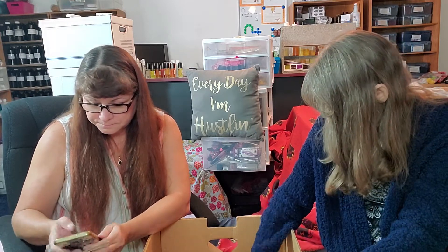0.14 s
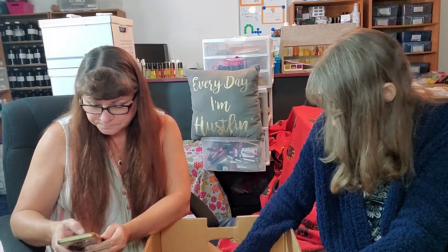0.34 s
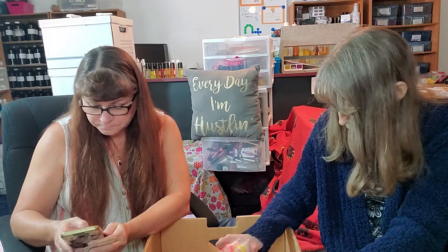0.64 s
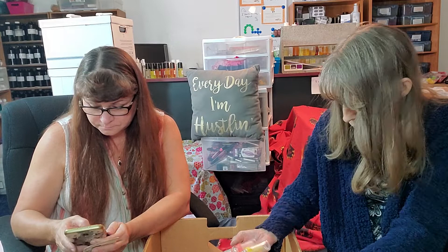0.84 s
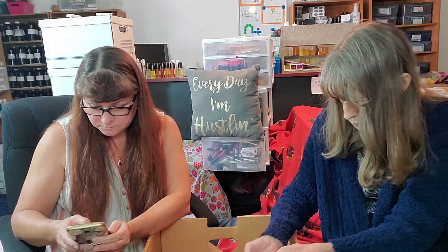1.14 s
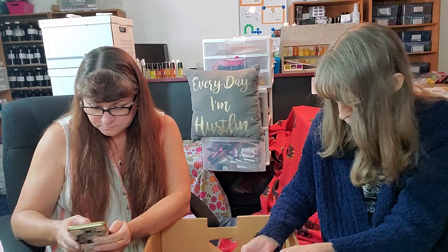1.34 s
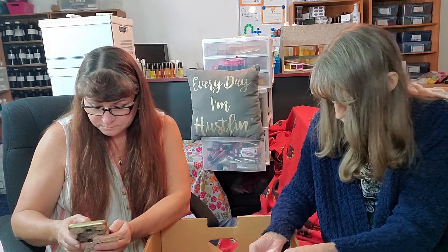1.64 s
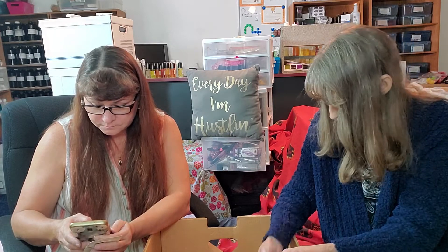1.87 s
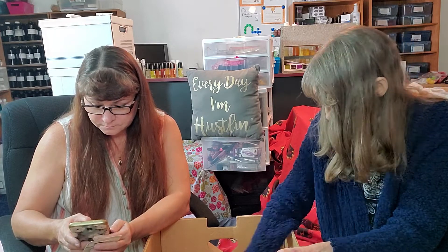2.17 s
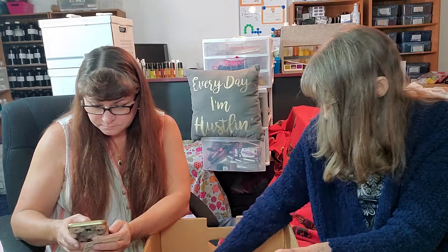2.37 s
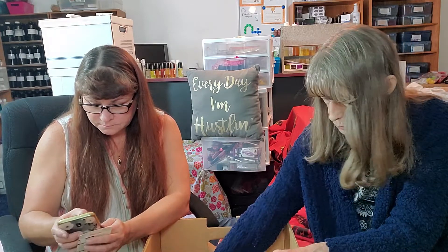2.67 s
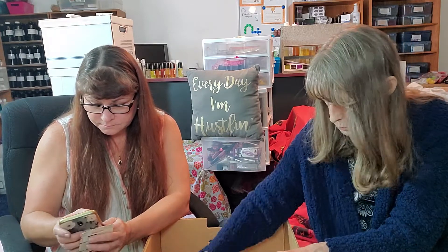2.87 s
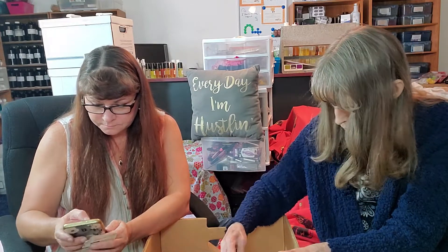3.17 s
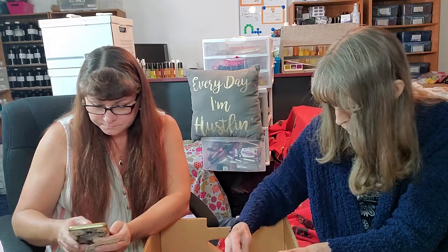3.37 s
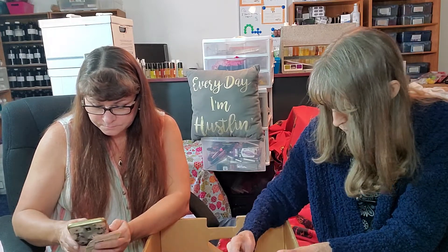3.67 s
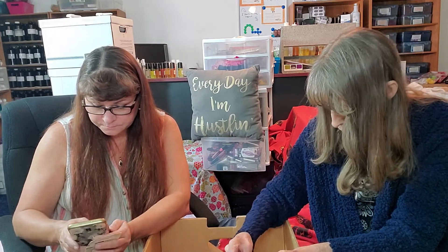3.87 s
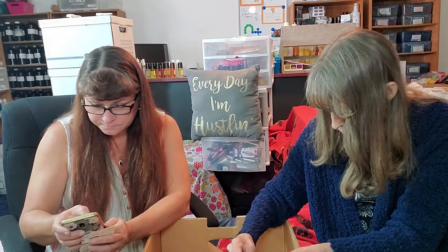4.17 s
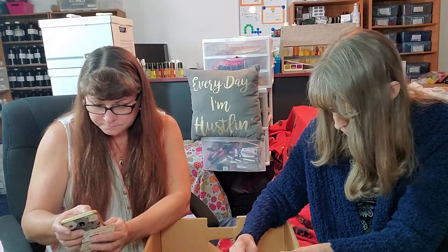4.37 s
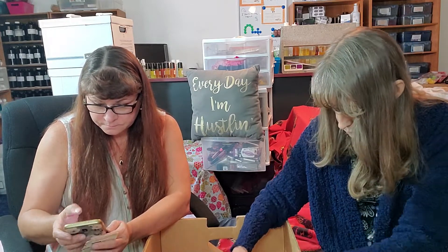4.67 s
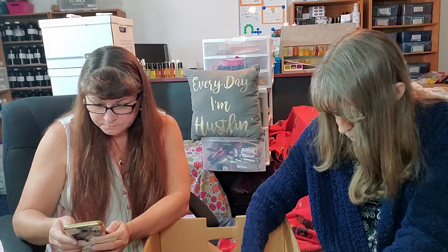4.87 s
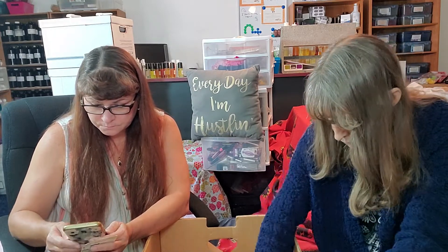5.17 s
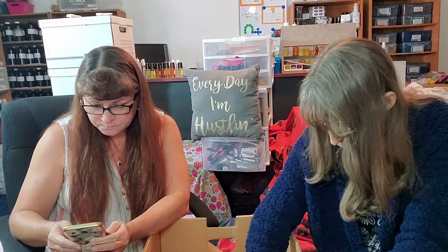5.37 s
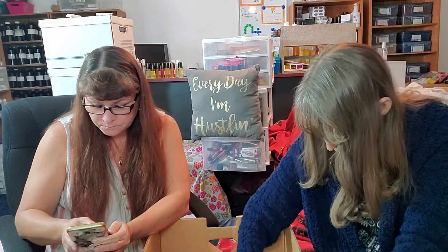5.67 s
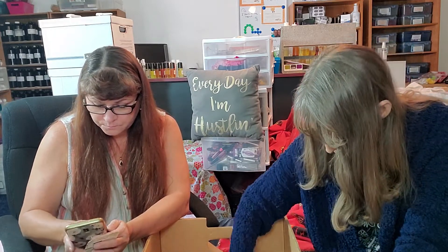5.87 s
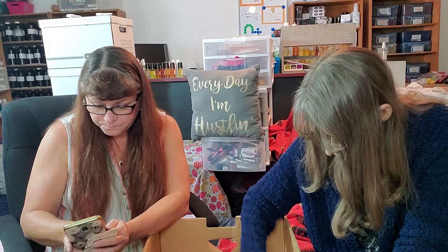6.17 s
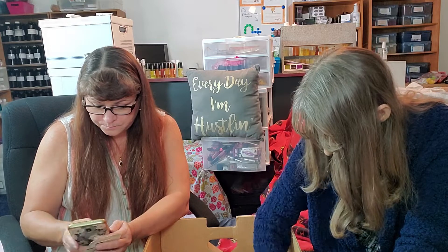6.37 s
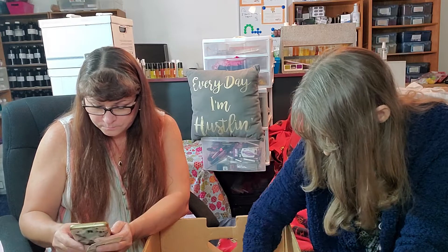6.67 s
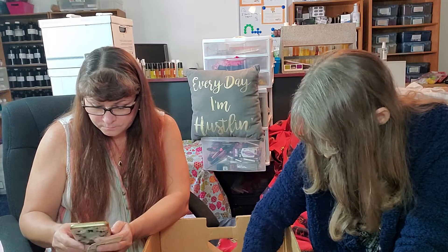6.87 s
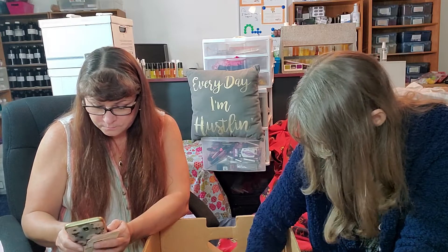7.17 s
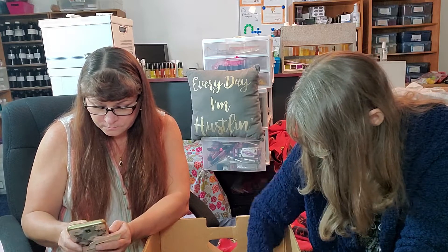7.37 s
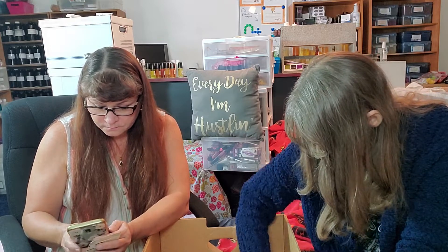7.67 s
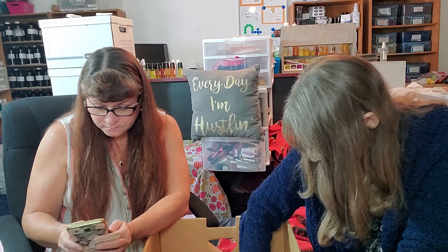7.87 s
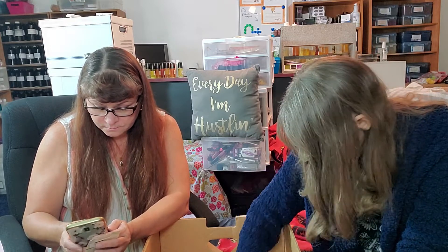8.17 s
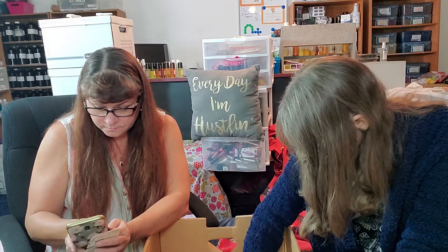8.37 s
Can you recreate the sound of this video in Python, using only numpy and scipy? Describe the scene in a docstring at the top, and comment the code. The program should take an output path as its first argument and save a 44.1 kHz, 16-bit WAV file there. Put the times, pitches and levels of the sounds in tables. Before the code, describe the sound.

Small hard plastic items click and knock in a cardboard box, sparsely at first, then rummaged with steady rattling and rustling in a small room.

```python
"""Small plastic cosmetics click against each other as they are picked up, dropped and rummaged through
in a cardboard box in a small room: noise chatter, short shell rings and scatter inside the box.
They knock on the cardboard (thuds and box modes); a small hard jar clinks three times, the first faintly.
Each stroke of the hand is a dense rattle of random tiny impacts over the rumble of the box walls.
Finger slides are fine friction noise; a short diffuse tail and a low hush lie behind."""
import sys
import numpy as np
from scipy import signal
from scipy.fft import rfft, irfft, next_fast_len
from scipy.io import wavfile
from scipy.ndimage import uniform_filter1d

SR = 44100
rng = np.random.default_rng(int(sys.argv[2]) if len(sys.argv) > 2 else 0)


def unload_wav(signal):
    """Save mono or channel-first audio to the path in sys.argv[1] as 16-bit WAV at rate SR, clipped to [-1, 1]."""
    wavfile.write(
        sys.argv[1],
        SR,
        np.round(np.clip(np.atleast_2d(signal).T, -1, 1) * 32767).astype(np.int16),
    )


N = 376613
TIME_S = np.arange(N) / SR
RING_S = TIME_S[:SR // 4]

# spectrum of hard plastic contact: (frequency [Hz], relative level [dB])
PLASTIC_SPECTRUM = [(100, -13), (400, -12), (1200, -15.5), (2200, -7.5), (3200, -1), (4100, -4.5),
                    (5300, 2), (7000, -1.5), (10000, -8), (16000, -11.5)]
# microphone response: (frequency [Hz], gain [dB])
MIC_RESPONSE = [(6900, -3), (7600, -8.5), (8500, -26.5), (10200, -15.5), (11500, -24), (16000, -24)]


def amp(db):
    """Decibels to gain."""
    return 10 ** (np.asarray(db) / 20)


def evened(x):
    """Scales to rms 1."""
    return x / np.sqrt(np.mean(x ** 2) + 1e-20)


def unit(x):
    """Scales to energy 1 per channel, averaged over the channels."""
    return evened(x) / np.sqrt(x.shape[-1])


def read(points, hz):
    """Interpolates a spectrum table on a log-frequency axis."""
    f, value = np.transpose(points)
    return np.interp(np.log(hz + 1), np.log(f + 1), value)


def add(mix, start_s, sound):
    """Adds a stereo sound at its start time."""
    part = mix[:, round(start_s * SR):][:, :sound.shape[-1]]
    part += sound[..., :part.shape[1]]


def colour(x, points, tilt_db=0, pivot_hz=1000, peak_hz=1000, peak_db=0, peak_octaves=0.063, size=4096):
    """Causal minimum-phase filter: a spectrum, tilted in dB per octave, plus an optional resonance."""
    hz = abs(np.fft.fftfreq(size, 1 / SR))
    db = read(points, hz) + tilt_db * np.clip(np.log2((hz + 1) / pivot_hz), -2, 2)
    db = db + peak_db / (1 + (np.log2((hz + 1) / peak_hz) / peak_octaves) ** 2)
    spectrum = np.exp(np.conj(signal.hilbert(np.log(amp(db)))))
    impulse = np.fft.ifft(spectrum).real[:size // 2]
    return signal.oaconvolve(x, impulse[None], axes=1)[:, :x.shape[1]]


def diffuse(x):
    """Makes two unrelated channels alike in the bass, as at two close ports."""
    # left-right likeness of diffuse sound: (frequency [Hz], correlation [-1..1])
    likeness = [(60, 1), (250, 0.91), (500, 0.36), (1000, 0.3), (2000, 0.57)]
    size = next_fast_len(x.shape[1] + len(RING_S))
    same = read(likeness, np.fft.rfftfreq(size, 1 / SR))
    a, b = rfft(x, size)
    return irfft([a, same * a + np.sqrt(1 - same ** 2) * b], size)[:, :x.shape[1]]


def ports(x, lag_samples=4.0, most_rad=1.87):
    """Delays the right port (the left if negative); the housing limits the phase lead in the treble."""
    size = next_fast_len(len(x) + len(RING_S))
    lead_rad = most_rad * np.tanh(2 * np.pi * np.fft.rfftfreq(size) * lag_samples / most_rad)
    return irfft(rfft(x, size) * np.exp(-1j * lead_rad * [[0], [1]]), size)[:, :len(x)]


def ring(modes):
    """Sums dying sines of random sign, energy 1; modes are (Hz, relative dB, t60 s)."""
    total = 0
    for hz, db, t60_s in modes:
        decay = amp(db - 60 * RING_S / t60_s)
        total = total + rng.choice([-1, 1]) * decay * np.sin(2 * np.pi * hz * RING_S)
    return unit(total)


def burst(t60_s):
    """A dying puff of noise, energy 1."""
    return unit(rng.standard_normal(len(RING_S)) * amp(-60 * RING_S / t60_s))


def scatter(t60_s):
    """Sound bouncing between the box walls and their contents, as diffuse dying noise."""
    return diffuse(np.array([burst(t60_s), burst(t60_s)]))


def chatter(contact_s):
    """Two faces bounce and scrape: noise that swells over the contact time and dies."""
    u = RING_S / contact_s
    return unit(rng.standard_normal(len(RING_S)) * u * np.exp(-u))


def clicks(level_db=21, shell_db=-4.0, body_db=4, scatter_db=-4, scatter_t60_s=0.16,
           side_mode_db=-4, pan_db=1.8, count=10):
    """Chatter through the body of the case, the short ring of its thin shell, and scatter in the box."""
    # plastic on plastic: (time [s], level re level_db [dB], main ring [Hz], face chatter time [s])
    click_events = [(0.0339,-26,5460,0.00061), (.203,-40,5070,0.00059), (.517,-40.5,4890,0.00054),
                    (.534,-41,3900,0.0019), (1.1935,-13.5,3350,0.0022), (1.1951,-10.5,6700,0.0035),
                    (1.284,-21.5,3520,0.0019), (1.2848,-35.5,5450,0.0011), (1.3046,-28,2230,.0019),
                    (1.3613,-25.5,3260,0.0023), (1.4498,-33.5,3960,0.0014), (2.066,-11.5,6130,0.0011),
                    (2.0723,-16.5,4900,.0021), (2.139,-31.5,5640,0.0058), (2.234,-25.5,4580,0.0013),
                    (2.241,-24.5,4930,0.0048), (2.3123,-19.5,3166,0.0019), (2.7278,-40,3560,0.0014),
                    (2.787,-42.5,7160,0.0021), (2.846,-27.5,4040,0.0011), (4.088,-28.5,3520,0.0022),
                    (4.096,-22,5798,0.0028), (4.7521,-21.5,2920,0.0022), (4.7703,-14,5700,.0004),
                    (4.8168,-20,4860,0.0018), (4.89,-26,3650,0.0015), (4.901,-20.5,4740,0.00035),
                    (4.9083,-26,4770,0.0038), (5.1833,-37,3030,0.004), (5.253,-29.5,4100,0.0072),
                    (5.339,-23.5,3110,0.0023), (5.3802,-29,3430,.002), (5.4572,-25.5,4730,0.0015),
                    (5.4853,-27.5,4930,.0015), (5.541,-24,2850,0.0018), (5.573,-23,4900,0.00066),
                    (5.5976,-23.5,5080,0.001), (5.6402,-25.5,6100,0.00071), (5.7311,-24.5,5040,0.0045),
                    (5.797,-21,5170,0.0033), (5.8179,-18.5,6380,0.00092), (5.8786,-19,3510,0.00036),
                    (5.9459,-28.5,6140,0.0024), (6.003,-38,6620,0.0011), (6.0226,-32,6720,0.00082),
                    (6.0818,-19,5600,0.0027), (6.1908,-28,3230,0.0046), (6.222,-19,5020,0.00093),
                    (6.4546,-22,3520,0.0051), (6.536,-24.5,6070,0.0062), (6.7169,-23.5,4770,.001),
                    (6.778,-23.5,5030,0.013), (6.815,-26,5130,0.0019), (6.877,-32,4340,0.0051),
                    (6.958,-34.5,3350,0.0048), (7.036,-31,3860,.001), (7.216,-33,3670,0.0056),
                    (7.2874,-28,3530,0.0011), (7.3018,-21,6480,0.0008), (7.367,-31.5,6100,0.0077),
                    (7.4639,-28.5,5750,0.002), (7.567,-35.5,2900,0.0022), (7.689,-26.5,3280,0.0023),
                    (7.747,-23,4630,0.0021), (7.906,-31.5,5130,0.0013), (7.953,-17.5,5370,0.0035),
                    (8.034,-24,4960,.0015), (8.0512,-16,5410,0.0003), (8.093,-29,4550,0.0013),
                    (8.1787,-26.5,5900,0.00034), (8.2566,-35,5050,0.0016), (8.3067,-36,4660,.002),
                    (8.351,-35.5,3260,0.0003), (8.3963,-26,6000,0.0032), (8.491,-38.5,3380,0.00062)]
    shell_t60_s = 0.032
    # smaller cases ring higher and sound brighter
    even_hz, brighten_db_per_oct_per_oct = 5370, 8.5
    out = np.zeros((2, N))
    for start_s, db, hz, contact_s in click_events:
        side_modes = [(f, side_mode_db, shell_t60_s) for f in rng.uniform(1300, 7600, count)]
        shell = ring([(hz, 0, shell_t60_s)] + side_modes)
        contact = ports(chatter(contact_s), lag_samples=rng.uniform(1.5, 12))
        shell = amp(shell_db) * ports(shell, lag_samples=rng.uniform(-3.7, 11.0))
        swell = 1 - np.exp(-RING_S / contact_s)
        sound = contact + swell * (shell + amp(scatter_db) * scatter(scatter_t60_s))
        tilt_db = brighten_db_per_oct_per_oct * np.log2(hz / even_hz)
        sound = colour(sound, PLASTIC_SPECTRUM, tilt_db, 6500, hz, body_db)
        sound = unit(colour(sound, MIC_RESPONSE))
        pan = np.array([[.5], [-.5]]) * pan_db * rng.standard_normal()
        add(out, start_s, amp(db + level_db + pan) * sound)
    return out


def knocks(level_db=23, thud_s=0.0045, thud_db=-6, box_db=-5, hollow_db=-12, hollow_t60_s=0.036, count=6):
    """A dull thud rings the whole box, the spot that is struck and the hollow case that lands there."""
    # landings: (time [s], level re level_db [dB], struck spot pitch [Hz], tilt [dB/octave])
    knock_events = [(0.032,-32.5,427,-1), (1.194,-23,786,1.5), (1.303,-25,326,0), (1.362,-26,255,7.5),
                    (2.066,-23.5,852,-2), (2.137,-33,1000,2), (2.235,-26.5,280,2), (2.313,-27,904,1),
                    (2.338,-19,260,0), (2.339,-22,727,4), (2.739,-39,690,-2), (2.89,-31.5,653,-2),
                    (2.907,-29,241,-1), (4.752,-21,139.4,-9.5), (4.899,-30,222,-10.5), (5.154,-32.5,235,-6),
                    (5.337,-29,240,-5), (5.419,-23.5,243,-6.5), (5.532,-25.5,134,-6.5),
                    (5.556,-30.5,594,-2), (5.587,-28.5,260,-4), (5.616,-28.5,140,-17),
                    (5.675,-24.5,229.5,-2), (5.816,-25.5,905,10), (6.106,-29.5,135,-6.5),
                    (6.348,-36.5,893,5), (6.395,-22,223,-5.5), (6.456,-24,816,8.5), (6.622,-32,924,4),
                    (6.714,-26,152,-13.5), (6.805,-29.5,268,-6.5), (7.148,-38,408,-7), (7.295,-32.5,240,-8),
                    (7.362,-31,227,-7), (7.462,-34.5,235,-9), (7.562,-28,278,-9), (7.701,-31,735,0),
                    (7.897,-28.5,253,1), (7.956,-30.5,557,-2.5), (8.089,-31.5,390,-1),
                    (8.149,-30.5,136,-6.5)]
    # box modes: (frequency [Hz], relative level [dB], t60 [s])
    box_modes = [(135, -3, 0.06), (244, -1.5, 0.059), (330, -7.5, 0.24), (400, -1.5, 0.071),
                 (533, 1.5, 0.057), (726, -6.5, .06), (830, -1, 0.11), (920, 0.5, 0.035)]
    # cardboard spectrum: (frequency [Hz], relative level [dB])
    cardboard_spectrum = [(40, -32.5), (90, -18.5), (135, -1.5), (250, 6), (380, 2.5), (750, 5), (1300, -2),
                          (2200, -10), (4000, -17), (9000, -44.5)]
    spot_cycles = 24  # cycles to fall 60 dB
    out = np.zeros((2, N))
    for start_s, db, hz, tilt_db in knock_events:
        hollow = ring([(f, 0, hollow_t60_s) for f in rng.uniform(500, 2200, count)])
        parts = [(thud_db, chatter(thud_s)), (box_db, ring(box_modes)), (hollow_db + tilt_db, hollow)]
        sound = 0
        for part_db, part in parts:
            sound = sound + amp(part_db) * unit(colour(ports(part), cardboard_spectrum, tilt_db, 340))
        swell = 1 - np.exp(-RING_S * hz)
        spot = ports(ring([(hz, 0, spot_cycles / hz)]) * swell)
        add(out, start_s, amp(db + level_db) * unit(sound + spot))
    return out


def jars(clink_db=22, tick_db=-3, tick_s=0.0022):
    """The hard jar's modes ring after a contact tick; each clink has its own spectral tilt."""
    # clinks: (time [s], level re clink_db [dB], tilt [dB/octave])
    clink_events = [(3.624, -47.5, -5.5), (3.6504, -27, -1), (7.148, -21.5, -1)]
    # jar modes: (frequency [Hz], relative level [dB], t60 [s])
    jar_modes = [(6160, 16, 0.043), (6400, 12, 0.11), (6760, 7.5, 0.096), (10200, -4.5, 0.03),
                 (9980, 11.5, 0.08)]
    out = np.zeros((2, N))
    for start_s, db, tilt_db in clink_events:
        body = ports(ring(jar_modes))
        tick = unit(colour(ports(chatter(tick_s)), PLASTIC_SPECTRUM))
        sound = unit(colour(body + amp(tick_db) * tick, MIC_RESPONSE, tilt_db, 4400))
        add(out, start_s, amp(db + clink_db) * sound)
    return out


def pings(level_db=21):
    """One stiff case sings on when touched: a thin, clear note of lightly damped modes."""
    # touches: (time [s], level re level_db [dB])
    ping_events = [(.204, -53), (.64, -52), (2.241, -28.5), (4.818, -30)]
    # stiff case modes: (frequency [Hz], relative level [dB], t60 [s])
    stiff_modes = [(5300, 3, 0.21), (5080, -4.5, .08)]
    out = np.zeros((2, N))
    for start_s, db in ping_events:
        add(out, start_s, amp(db + level_db) * ports(ring(stiff_modes)))
    return out


def taps(level_db=22, note_t60_s=0.043, twin_t60_s=0.019):
    """A small pot, never quite round, gives a soft hollow note of two close modes."""
    # taps: (time [s], level re level_db [dB], upper mode [Hz])
    tap_events = [(3.18, -55, 1667), (3.328, -54, 1310), (3.6493, -35, 962), (1.366, -29, 1273),
                  (7.345, -39.5, 1575)]
    out = np.zeros((2, N))
    for start_s, db, hz in tap_events:
        note = ring([(hz, 0, note_t60_s), (.93 * hz, -5, twin_t60_s)])
        add(out, start_s, amp(db + level_db) * ports(note))
    return out


def slips(per_s, spread_db):
    """Stick and slip: random tiny impacts, a few much larger than the rest."""
    size = amp(spread_db * np.minimum(rng.exponential(1, N), 3.5))
    return size * rng.choice([-1, 1], N) * (rng.random(N) < per_s / SR)


def catching(depth_db, grip_s):
    """Gain of a rubbing contact that catches and lets go at random; depth is rms."""
    return amp(depth_db * evened(uniform_filter1d(rng.standard_normal(N), round(grip_s * SR))))


def stroke(start_s, length_s):
    """Gain of one stroke: a quick start, an arch of hand pressure, then the heap settles."""
    attack_s, press_share = 0.005, 0.39  # pressure peaks at this share of the length
    start_db, end_db, settle_db_per_s = -8, -7, 359
    t = TIME_S - start_s
    arch_db = np.interp(t / length_s, [0, press_share, 1], [start_db, 0, end_db])
    settle_db = settle_db_per_s * np.maximum(t - length_s, 0)
    return np.clip(t / attack_s, 0, 1) * amp(arch_db - settle_db)


def rummage(rattle_db=-2.0, rub_db=-2.5, case_t60_s=0.023, grit_db=-9, scatter_db=-5, count=20):
    """Cases scrape past each other in fits, damped by the heap, which rubs along the cardboard."""
    # hand strokes: (start [s], length [s], case level re rattle_db [dB], rub level re rub_db [dB])
    stroke_events = [(5.144, 0.48, -44, -46), (5.328, 0.69, -35, -38.5), (5.77, 0.39, -43, -49.5),
                     (6.385, 0.11, -33, -37.5), (6.606, 0.25, -32.5, -36), (6.924, 0.31, -52, -56.5),
                     (7.243, 0.26, -41.5, -47.5), (7.673, 0.44, -40, -42), (7.905, 0.38, -35, -41.5),
                     (8.302, 0.23, -44, -47)]
    # rattle spectrum: (frequency [Hz], relative level [dB])
    rattle_spectrum = [(400, -22.5), (900, -12), (1200, -10), (2200, -7), (3300, -3), (4400, -6.5),
                       (5050, -4), (6700, -8), (7500, -14.5), (8600, -30), (10200, -32), (16000, -50.5)]
    # rubbing spectrum: (frequency [Hz], relative level [dB])
    rubbing_spectrum = [(60, -4.5), (100, -12), (135, 8), (185, -3.5), (243, 5), (320, -3), (400, -2),
                        (470, -12), (570, -6.5), (820, -6.5), (1100, -27.5), (4000, -36.5)]
    cases = np.zeros((2, N))
    for pitches_hz in rng.uniform(801, 7660, (count, 5)):
        body = ring([(hz, 0, case_t60_s) for hz in pitches_hz]) + .5 * burst(.004)
        case = ports(body, lag_samples=rng.uniform(-1.6, 8.1)) + amp(scatter_db) * scatter(0.028)
        scrape = slips(28, 4.5) * np.minimum(catching(depth_db=9, grip_s=.025), 3)
        cases += signal.oaconvolve(scrape[None], case, axes=1)[:, :N]
    grit = slips(300, 5.5) * catching(depth_db=3, grip_s=.012)
    rattle = evened(colour(evened(cases) + amp(grit_db) * evened(ports(grit)), rattle_spectrum))
    rub = evened(colour(ports(slips(700, 2.5)), rubbing_spectrum))
    out = np.zeros((2, N))
    for start_s, length_s, cases_db, wall_db in stroke_events:
        sound = amp(rattle_db + cases_db) * rattle + amp(rub_db + wall_db) * rub
        out += stroke(start_s, length_s) * sound
    return out


def slide(start_s, length_s):
    """Gain of one slide: it grows as the grip tightens, reaching 0 dB at its end, then lets go."""
    attack_s, grip_db_per_s, let_go_db_per_s = 0.0057, 31.5, 160
    left_s = start_s + length_s - TIME_S
    drop_db = np.maximum(grip_db_per_s * left_s, -let_go_db_per_s * left_s)
    return np.clip((TIME_S - start_s) / attack_s, 0, 1) * amp(-drop_db)


def fingers(level_db=-1):
    """Fine friction of skin and sleeve on smooth plastic, catching and letting go with tiny crackles."""
    # slides: (start [s], length [s], end level re level_db [dB])
    slide_events = [(0.01, 0.0063, -42), (0.624, 0.18, -62), (0.874, 0.39, -50.5), (2.413, 0.098, -52),
                    (2.627, 0.09, -55.5), (4.548, 0.032, -57)]
    # sliding spectrum: (frequency [Hz], relative level [dB])
    sliding_spectrum = [(1000, -11), (3000, -11), (4500, -10), (6600, -1.5), (8500, -26), (16000, -26)]
    grains = slips(1500, 4.5) * catching(depth_db=2.5, grip_s=.05)
    friction = evened(colour(ports(grains), sliding_spectrum))
    gain = sum(amp(level_db + db) * slide(start_s, length_s) for start_s, length_s, db in slide_events)
    return friction * gain


def room(x, wet_db=-5, build_s=0.0025):
    """A short diffuse tail, each band dying at its own speed."""
    # echo spectrum: (frequency [Hz], relative level [dB])
    echo_spectrum = [(120, -8.5), (300, -1), (900, -2), (8000, -1)]
    # echo decay: (frequency [Hz], t60 [s])
    echo_decay = [(120, 0.25), (500, 0.25), (1400, 0.25), (7000, 0.12), (14000, 0.16)]
    hz, t, bands = signal.stft(diffuse(rng.standard_normal((2, SR // 2))), SR, nperseg=256)
    band_db = read(echo_spectrum, hz)[:, None] - 60 * t / read(echo_decay, hz)[:, None]
    tail = signal.istft(bands * amp(band_db), SR, nperseg=256)[1]
    build = 1 - np.exp(-(TIME_S[:tail.shape[1]] / build_s) ** 2)
    return amp(wet_db) * signal.fftconvolve(x, unit(tail * build), axes=1)[:, :N]


def hush(level_db=-56):
    """The low hush of the house: steady, diffuse coloured noise."""
    # hush spectrum: (frequency [Hz], relative level [dB])
    hush_spectrum = [(12, -44), (20, -10.5), (75, -2.5), (100, -11.5), (125, -2), (160, -15), (558, -22.5),
                     (1060, -31.5), (6360, -39.5), (8650, -57.5), (16000, -53)]
    return amp(level_db) * evened(colour(diffuse(rng.standard_normal((2, N))), hush_spectrum))


def scene(right_db=0.6):
    """Everything in the box, a little louder on the right; its room; the hush."""
    box = clicks() + knocks() + jars() + pings() + taps() + rummage() + fingers()
    box = box * amp([[-right_db / 2], [right_db / 2]])
    return box + room(box) + hush()


def record(dry, edge_hz=16200):
    """The band limit of the recorder, a linear-phase low-pass."""
    lowpass = signal.firwin(511, edge_hz, window=("kaiser", 9), fs=SR)
    return signal.oaconvolve(dry, lowpass[None], "same")


dry = scene()
out = record(dry)
unload_wav(out)
```